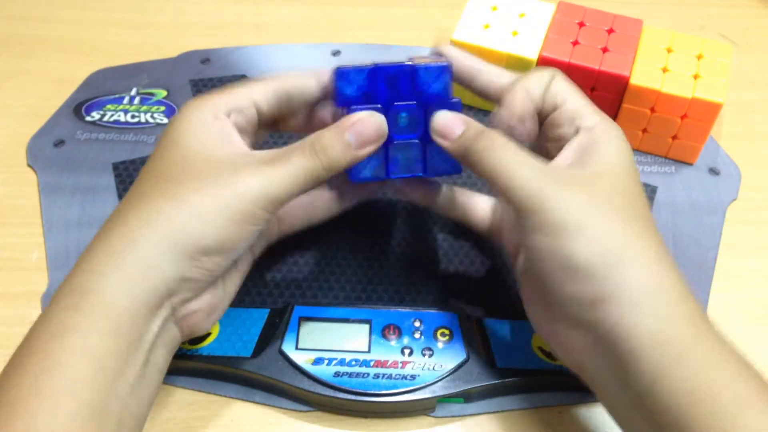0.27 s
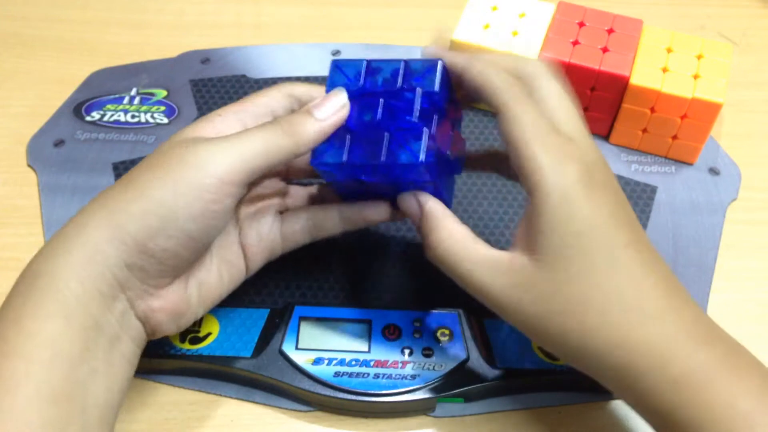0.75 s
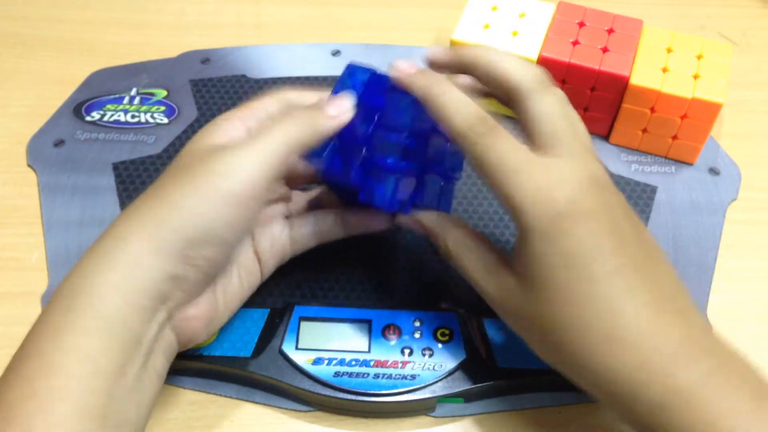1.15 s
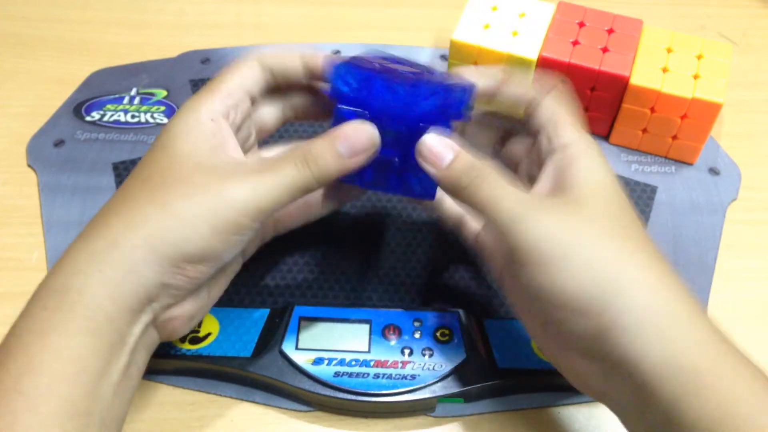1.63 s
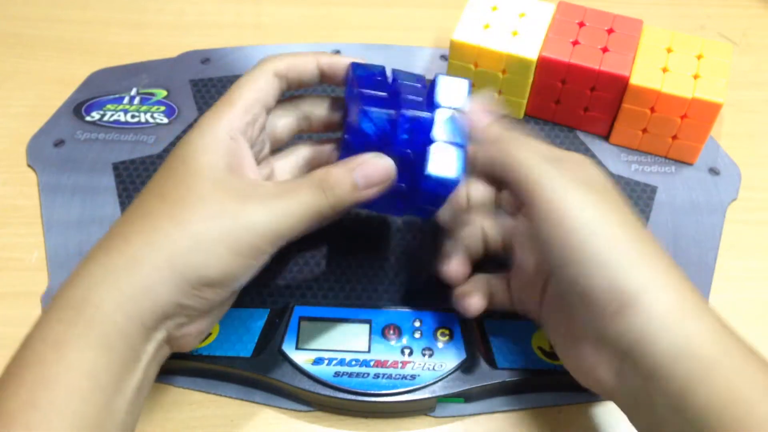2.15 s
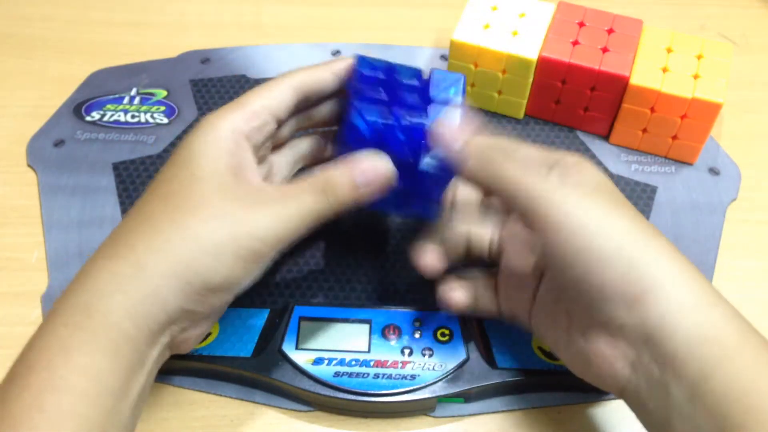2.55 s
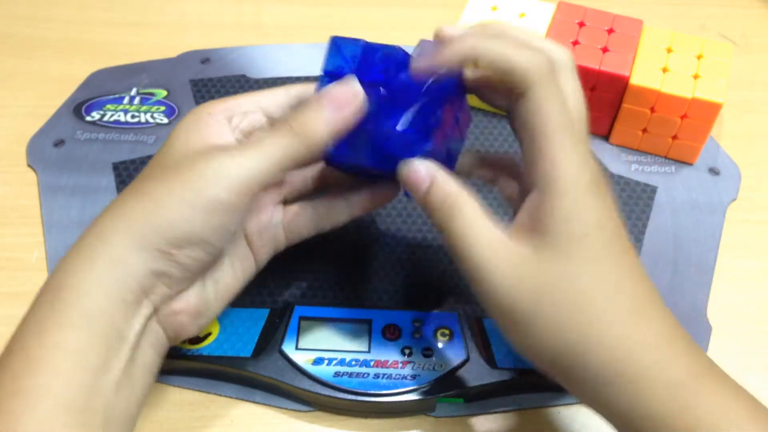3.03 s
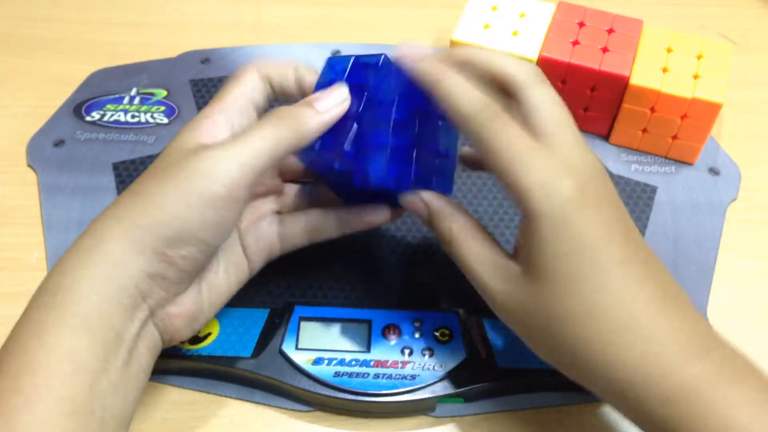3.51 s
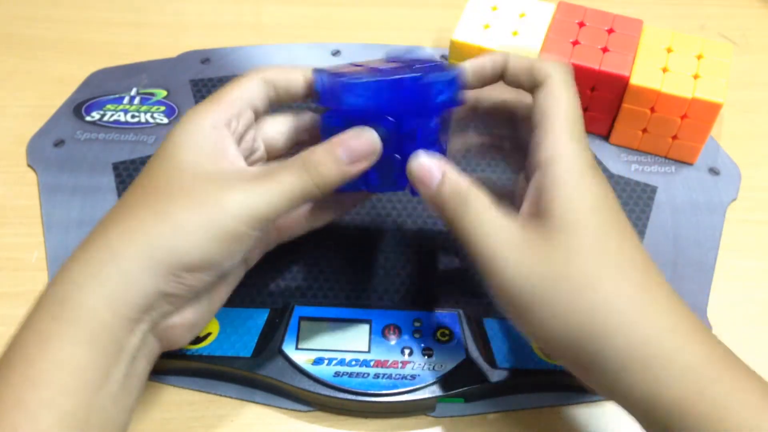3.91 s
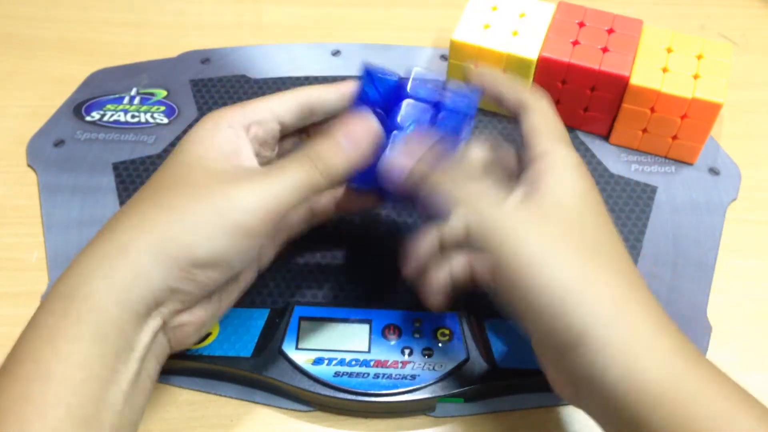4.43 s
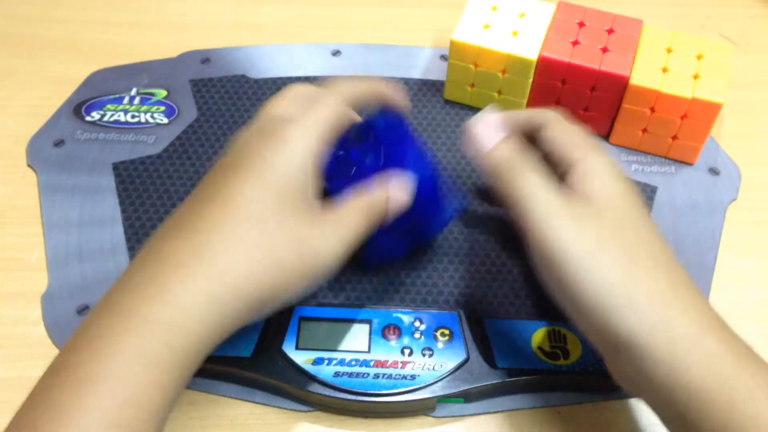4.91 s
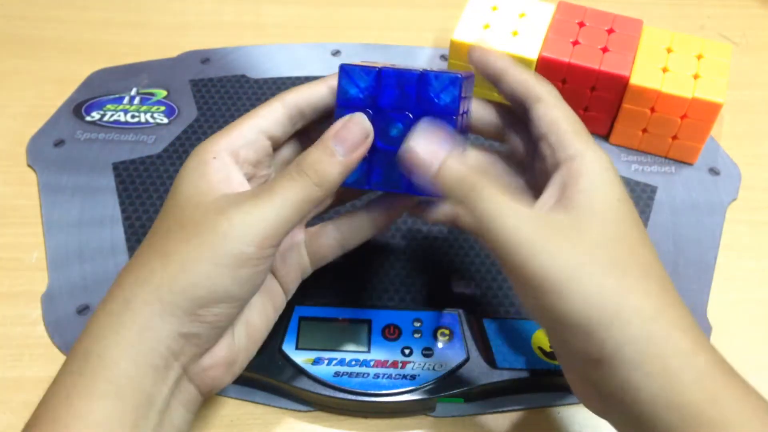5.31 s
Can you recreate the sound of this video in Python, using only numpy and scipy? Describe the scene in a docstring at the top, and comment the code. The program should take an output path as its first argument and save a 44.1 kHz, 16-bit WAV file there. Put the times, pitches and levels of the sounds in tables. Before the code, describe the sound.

A hollow plastic puzzle cube is turned fast by hand, rattling and clacking in quick bursts, then knocks softly onto a matted desk.

```python
"""Fast turning of a puzzle cube

A plastic speed cube is turned fast in the hands above a desk mat, in a small quiet room.
Each flick slides a layer with a fine rattle, made of many tiny noisy slips, and loose pieces tick along.
Hollow pieces collide and seat in clusters of clacks: bursts of noise plus short ringing tones.
Soft, smooth swishes of noise around 1.4 kHz swell and fade now and then.
Near the end the cube knocks on the mat and the desk thuds softly.
Hiss, a faint hum and a slow rumble lie behind it all."""
import sys
import numpy as np
from scipy import signal
from scipy.fft import rfft, irfft
from scipy.io import wavfile

SR = 44100
rng = np.random.default_rng(int(sys.argv[2]) if len(sys.argv) > 2 else 0)


def log_audio(samples):
    """Write samples as a 16-bit WAV file to the path given in sys.argv[1]."""
    # one column per channel
    frames = np.atleast_2d(samples).T
    # limit to full scale, then quantise
    limited = np.clip(frames, -1, 1)
    pcm = np.round(limited * 32767).astype(np.int16)
    wavfile.write(sys.argv[1], SR, pcm)


N = 245183
TIME = np.arange(N) / SR

# room air and microphone hiss, tone colour: (frequency [Hz], relative level [dB per Hz])
AIR_COLOUR = [(15, -33), (30, -27), (39, 2.5), (62, -6), (90, -2), (130, -0.5), (200, -4.5), (300, -7),
              (500, -9.5), (800, -9), (1400, -11.5), (2400, -15), (10000, -15), (13200, -8.5)]
AIR_DB = -60
# faint hum in the room: (frequency [Hz], level [dB])
HUM_TONES = [(199.2, -82)]
# a low rumble that swells and sinks: (time [s], level [dB])
RUMBLE_LEVELS = [(0, -87), (.75, -79), (.95, -71.5), (1.3, -77.5), (1.8, -86), (2.5, -78.5), (3.1, -77),
                 (3.7, -77), (4.2, -90), (5.55, -91)]
# colour of the rumble: (frequency [Hz], relative level [dB])
RUMBLE_TONE = [(20, -34), (32, -20), (42, -8), (62, -13), (90, 12), (125, -7), (250, -30), (600, -48)]

# a layer is flicked round, speeds up and is braked:
# (time at full speed [s], level before trim [dB], speeding-up [s], braking [s])
LAYER_TURNS = [(0.013, -39.5, 0.09, .06), (.10, -48, 0.027, 0.039), (.275, -48, 0.071, 0.14),
               (.385, -49, 0.063, 0.089), (0.519, -47.5, 0.047, 0.045), (1.08, -46.5, 0.079, 0.02),
               (1.255, -47, 0.076, 0.25), (1.425, -44, 0.16, 0.029), (1.533, -38, 0.024, 0.04),
               (1.685, -40, 0.029, 0.03), (1.85, -41.5, 0.082, 0.07), (1.972, -45, 0.018, 0.026),
               (2.075, -39.5, .05, 0.072), (2.419, -56.5, 0.028, 0.098), (2.63, -48, 0.046, .17),
               (2.84, -44, 0.1, 0.13), (3.02, -49, 0.14, 0.084), (3.185, -42, 0.019, .03),
               (3.36, -44.5, 0.1, 0.11), (3.465, -49.5, .03, 0.055), (3.545, -43, 0.019, 0.036),
               (3.645, -45.5, 0.061, .15), (3.765, -38.5, 0.1, .03), (3.94, -42.5, 0.12, 0.25),
               (4.09, -44.5, 0.039, 0.042), (4.178, -52, .03, 0.088), (4.29, -52, 0.048, 0.056),
               (4.415, -45.5, 0.078, 0.13), (4.565, -45, 0.037, 0.1), (4.66, -52, .04, 0.032)]
TURN_RANGE_DB = 17  # how far below full speed a turn is where speeding-up starts and braking ends
# colour of the sliding: (frequency [Hz], relative level [dB])
SLIDE_TONE = [(150, -43), (500, -11), (800, 1.5), (1150, 1.5), (1400, 6), (1750, 7), (2200, 2), (3000, 1),
              (6000, 2.5), (8500, 0), (12000, -0.5), (15500, -8.5)]

# loose pieces tick all the while: level against the turning, its spread, hollow body, treble [dB]; ring [s]
TICK_DB, TICK_SPREAD_DB, TICK_BODY_DB, TICK_TREBLE_DB, TICK_T60 = 2, 2.5, -4, 1.5, 0.0094
IDLE_DB = -68  # keeps the ticks going between turns, while the fingers work
HANDLING_END_S = 4.8  # the ticking stops when the cube knocks on the mat

# pieces colliding and seating:
# (time [s], level before trim [dB], hollow body [dB], treble [dB], time to fade by 60 dB [s])
COLLISIONS = [(0.0185, -30.5, -13, 13, 0.015), (0.0273, -35, 1, -3, 0.032), (0.0656, -39, -2.5, -2, 0.06),
              (.247, -39, -12, 1, .012), (0.2705, -32.5, -1.5, 5.5, 0.015), (0.378, -33.5, -7.5, 0.5, 0.04),
              (.521, -32, -8, 6, 0.0061), (0.5295, -33.5, 9, 14, 0.017), (0.6555, -52.5, -1, 0, 0.007),
              (0.7984, -52, 6.5, 10.5, .032), (.8487, -54, -2, -2, 0.027), (0.882, -54, 5, 1, 0.013),
              (0.9135, -56, 5, -14, 0.037), (1.012, -59, -7, -6, .01), (1.056, -47.5, -8, -3, 0.087),
              (1.0798, -48, -3, 5, 0.036), (1.1465, -45.5, -1, -4, 0.037), (1.186, -28, -12, 3, 0.018),
              (1.2385, -43.5, 6, 13, .007), (1.2493, -34, -4, 4.5, 0.017), (1.2744, -39, -1, -7, .012),
              (1.3121, -40.5, -11, 2, 0.0062), (1.4017, -38, -14, 1, 0.019), (1.4128, -42, -18, 5, .007),
              (1.4251, -38, -11, 10, 0.032), (1.436, -36, -10, 1, .019), (1.505, -37, -5, 11, 0.029),
              (1.529, -28.5, -4.5, 5, 0.078), (1.5545, -37, -10, 6, .032), (1.659, -41, 2, 12, 0.01),
              (1.6771, -26.5, -6, 5.5, 0.015), (1.6942, -29.5, -8, 6, 0.017), (1.711, -39.5, -9, 1, 0.022),
              (1.822, -31.5, -24, 5.5, 0.044), (1.8441, -31.5, -9, 6, 0.029), (1.854, -35, -25, -2, 0.014),
              (1.981, -40.5, -2.5, -2, .029), (2.027, -41, 2.5, 5, 0.026),
              (2.0464, -29.5, -6.5, 2.5, 0.0083), (2.071, -26, -3, 10, 0.03),
              (2.079, -21.5, -8, 5.5, 0.029), (2.0955, -37, -8, -3, .015), (2.1117, -35, -9.5, -2, 0.057),
              (2.1853, -41, -6, 1, 0.0059), (2.2639, -52, -4, 0, 0.011), (2.5866, -34.5, -11, 4.5, 0.01),
              (2.606, -40, -7, -2, .015), (2.618, -35.5, -7, 4, 0.02), (2.6332, -33, -8, -2, 0.019),
              (2.68, -38, -3.5, 0.5, 0.091), (2.7152, -37, -8.5, -5, 0.01), (2.746, -42, 7, 11, .018),
              (2.774, -37.5, -6.5, 0, 0.01), (2.8196, -39, -14, 0, 0.089), (2.8439, -39, -14, 0, .03),
              (2.857, -36.5, -19, 1, .012), (2.8807, -32, -4, 1, 0.021), (2.917, -34.5, 1.5, -5, 0.0054),
              (3.004, -41, -9, -1, 0.046), (3.048, -42.5, -12, -9, 0.027), (3.1221, -35.5, -2.5, 2.5, 0.02),
              (3.1787, -39.5, -11.5, 9, .04), (3.1846, -32, -7, 1, .014), (3.197, -33, -4.5, 4, 0.019),
              (3.3112, -35.5, -9, 10, .039), (3.3177, -33.5, 1, 11.5, .007), (3.3477, -37, -25, 4, 0.018),
              (3.364, -25.5, -19, 2, 0.008), (3.3777, -27, -7, 4, 0.034), (3.5026, -43, 1, 6, 0.018),
              (3.5349, -35.5, 0.5, -2.5, 0.037), (3.6225, -42.5, -14, 7, 0.02),
              (3.7413, -33, -9.5, -0.5, 0.045), (3.7606, -27, -10, 4, 0.055), (3.7825, -36, -5, -1, .016),
              (3.8377, -39, -6.5, 0, 0.011), (3.8827, -37, -7, 1, 0.035),
              (3.9219, -26.5, -10.5, 3.5, 0.025), (3.9481, -32, -10.5, 4, 0.054),
              (3.9967, -29.5, -7, 8, 0.0079), (4.0295, -31, -16, 6, .036), (4.0726, -34.5, -14, 18, 0.034),
              (4.0793, -30.5, -11, 3.5, 0.059), (4.1018, -25, 5.5, 22.5, 0.018),
              (4.165, -38.5, -1, 8, 0.027), (4.241, -42, -3, -2, 0.0089), (4.278, -40, -5, 2.5, .023),
              (4.393, -33.5, -10, 14, 0.011), (4.405, -32, -0.5, 1, .005), (4.4635, -35.5, -6, 2, .018),
              (4.477, -33, -1, 1, 0.012), (4.5213, -38, -6.5, -7, 0.0073), (4.5782, -30.5, -5, 2, 0.053),
              (4.6772, -37, -2, 4.5, 0.013), (4.807, -36.5, 0, 1.5, 0.068), (5.511, -54.5, 7.5, 5, 0.1)]
# resonances of the hollow pieces, before each hit varies them:
# (frequency [Hz], time to fade by 60 dB [s], relative level [dB])
SHELL_TONES = [(731, 0.065, -10), (969, 0.061, -2.5), (1440, 0.023, -8.5), (1751, 0.065, -3.5),
               (2403, 0.059, -14), (3020, 0.042, -1), (3895, 0.041, -3), (4750, 0.016, 2.5),
               (5940, 0.0072, 6.5), (8100, 0.022, 0.5), (9180, 0.0025, 12.5), (13600, .007, -20)]
# colour of a collision: (frequency [Hz], relative level [dB])
CLACK_TONE = [(150, -20), (400, -9), (550, -15), (720, -1.5), (850, -5.5), (1100, -1), (1700, 1),
              (2400, 3.5), (3200, 1.5), (6000, 2.5), (8500, 7), (11000, 3.5), (13500, 4), (15500, -4)]
SCUFF_DB, SCUFF_T60 = -10.5, 0.015  # scuff around a clack: level against the blow [dB], fade [s]
RISE_S, SNAP_T60 = 0.00039, 0.0012  # rise of the blow [s], fade of its hard snap [s]

# soft, smooth swishes that swell and fade: (time at the middle [s], length [s], level [dB])
SOFT_SWISHES = [(0.705, 0.078, -69), (1.307, 0.36, -61), (3.003, 0.21, -61.5), (4.36, 0.22, -61.5),
                (5.14, 0.17, -73)]
# colour of the swishes: (frequency [Hz], relative level [dB])
SWISH_TONE = [(400, -32), (900, -16), (1350, 4), (1750, -6.5), (2600, -15), (8000, -28)]

# resonances of the desk under the mat: (frequency [Hz], time to fade by 60 dB [s], level [dB])
DESK_TONES = [(75.5, 0.15, -42), (93.8, 0.57, -50), (162, 0.11, -42.5), (256, 0.16, -56)]
KNOCK_S = 4.807

TOP_HZ = 15400  # the recorder keeps what lies below this


def undb(db):
    """Turn decibels into a plain multiplier."""
    return 10 ** (np.asarray(db) / 20)


def unit(x):
    """Scale to an average strength (rms) of 1."""
    return x / np.sqrt(np.mean(x ** 2))


def band(x, lo_hz, hi_hz):
    """Keep mainly the pitches between two frequencies, without looking ahead in time."""
    return signal.sosfilt(signal.butter(3, [lo_hz, hi_hz], "band", fs=SR, output="sos"), x)


def colour(x, points, size=4096):
    """Shape the tone through (frequency [Hz], level [dB]) points, without looking ahead in time."""
    hz, db = np.transpose(points)
    grid = np.maximum(np.fft.rfftfreq(size, 1 / SR), 1)
    curve_db = np.interp(np.log(grid), np.log(hz), db)
    # folding the cepstrum (the spectrum of the log spectrum) makes the filter respond at once
    cepstrum = irfft(np.log(undb(curve_db)))
    cepstrum[1:size // 2] *= 2
    cepstrum[size // 2 + 1:] = 0
    response = irfft(np.exp(rfft(cepstrum)))
    return signal.fftconvolve(x, response)[:len(x)]


def fade(t, t60):
    """Die away smoothly, 60 dB down after t60 seconds."""
    return np.exp(-np.log(1000) * t / t60)


def add(out, s, sound):
    """Mix a sound in at time s."""
    start = max(int(s * SR), 0)
    out[start:start + len(sound)] += sound[:max(N - start, 0)]


def quiet():
    """Room air and microphone hiss as noise, a faint steady hum and a slowly swelling rumble."""
    air = undb(AIR_DB) * unit(colour(rng.standard_normal(N), AIR_COLOUR, size=16384))
    # the square root of 2 gives each tone its level as rms
    hum = sum(np.sqrt(2) * undb(db) * np.sin(2 * np.pi * hz * TIME) for hz, db in HUM_TONES)
    rumble = unit(colour(rng.standard_normal(N), RUMBLE_TONE, size=16384))
    rumble_level = undb(np.interp(TIME, *np.transpose(RUMBLE_LEVELS)))
    return air + hum + rumble * rumble_level


def turning():
    """Strength of the turning over time: every flick swells to full speed and dies away."""
    speed = 0
    for s, db, rise_s, brake_s in LAYER_TURNS:
        # 0 at full speed, 1 at the start of speeding-up and at the end of braking
        away = np.maximum((s - TIME) / rise_s, (TIME - s) / brake_s)
        speed = np.maximum(speed, undb(db - TURN_RANGE_DB * away))
    return speed


def grainy_noise(grain_rate, spread_db, grain_t60, smooth_db, size=512):
    """Noise made of dense tiny bursts of uneven size (rate per second) above a smooth hiss."""
    happens = rng.random(N) < grain_rate / SR
    grains = happens * undb(spread_db * np.minimum(rng.exponential(size=N), 3))
    # each grain releases a short burst of energy
    energy = signal.fftconvolve(grains ** 2, fade(TIME[:size], grain_t60) ** 2)[:N]
    strength = unit(np.sqrt(np.abs(energy)))
    return unit(rng.standard_normal(N) * (strength + undb(smooth_db)))


def sliding(speed, trim_db=-2):
    """Edges tick over each other in tiny slips while a layer turns, louder when it turns faster."""
    slips = grainy_noise(grain_rate=480, spread_db=4.5, grain_t60=.007, smooth_db=-10)
    return unit(colour(slips, SLIDE_TONE)) * speed * undb(trim_db)


def loose_ticks(speed, colour_spread_db=3, count=260):
    """Small collisions at uneven moments, stronger as the turning is faster; rows as in COLLISIONS."""
    s = (np.arange(count) + rng.random(count)) * HANDLING_END_S / count
    strength, body, treble = rng.standard_normal((count, 3)).T
    drive = np.interp(s, TIME, speed) * undb(TICK_DB) + undb(IDLE_DB)
    level_db = 20 * np.log10(drive) + TICK_SPREAD_DB * strength
    body_db = TICK_BODY_DB + colour_spread_db * body
    treble_db = TICK_TREBLE_DB + colour_spread_db * treble
    return np.column_stack([s, level_db, body_db, treble_db, np.full(count, TICK_T60)])


def attack_rms(x, lead, attack):
    """Average strength of each hit just after the pieces meet."""
    return np.sqrt(np.mean(x[:, lead:lead + attack] ** 2, axis=1, keepdims=True))


def clacks(rows, snap_db=4, ring_db=-9, detune=0.052, body_hz=2000, treble_hz=6500, trim_db=-1,
           chatter_db=1.0, size=2560):
    """Each collision is a brief scuff, a hard snap, a chatter of loose pieces and a ring of the hollow shells."""
    s, level_db, body_db, treble_db, t60 = np.transpose(rows)[:, :, None]
    lead, attack, contact = int(.008 * SR), int(.004 * SR), 16  # in samples
    t = (np.arange(size) - lead) / SR
    after = np.maximum(t, 0)

    # bevelled edges drag over each other around the moment they seat
    scuff = undb(SCUFF_DB) * fade(np.abs(t), SCUFF_T60)
    decay = fade(after, t60) + undb(snap_db) * fade(after, SNAP_T60)
    blow = decay * (1 - np.exp(-after / RISE_S))
    # the blow runs on through neighbouring pieces as a string of brief uneven contacts
    contacts = undb(chatter_db * rng.standard_normal((len(s), size // contact)))
    chatter = np.repeat(contacts, contact, axis=1)
    hits = rng.standard_normal((len(s), size)) * chatter * (scuff + blow)

    for hz, mode_t60, db in SHELL_TONES:
        # another piece is struck at another spot each time, so tuning and strength vary
        tuning, strength = rng.uniform(-1.23, 1, (len(s), 2)).T[:, :, None]
        tone = np.sin(2 * np.pi * hz * (1 + detune * tuning) * after)
        hits += undb(db + ring_db) * strength * fade(after, mode_t60) * tone

    # flat faces meeting sound hollow, corners catching sound bright
    parts = band(hits, 340, body_hz), band(hits, body_hz, treble_hz), band(hits, treble_hz, 18600)
    body, middle, treble = (part / attack_rms(part, lead, attack) for part in parts)
    hits = undb(body_db) * body - middle + undb(treble_db) * treble
    hits *= undb(level_db + trim_db) / attack_rms(hits, lead, attack)

    out = np.zeros(N)
    for when, hit in zip(s.ravel(), hits):
        add(out, when - lead / SR, hit)
    return colour(out, CLACK_TONE)


def soft_swishes():
    """Smooth noise, strongest around 1.4 kHz, swells and fades now and then."""
    swell = sum(undb(db) * np.exp(-2 * ((TIME - s) / length) ** 2) for s, length, db in SOFT_SWISHES)
    noise = grainy_noise(grain_rate=350, spread_db=0, grain_t60=0.022, smooth_db=-3)
    return swell * unit(colour(noise, SWISH_TONE))


def desk_thud(push_s=0.012, boom_db=-58, boom_t60=0.65, boom_lo_hz=65, boom_hi_hz=280):
    """The rubber mat softens the knock, so only low desk-top tones ring, and the room booms briefly."""
    out, t = np.zeros(N), TIME[:SR]
    ring = sum(undb(db) * fade(t, t60) * np.sin(2 * np.pi * hz * t) for hz, t60, db in DESK_TONES)
    low_noise = unit(band(rng.standard_normal(len(t)), boom_lo_hz, boom_hi_hz))
    boom = undb(boom_db) * fade(t, boom_t60) * low_noise
    soft_start = 1 - np.exp(-t / push_s)
    add(out, KNOCK_S, (ring + boom) * soft_start)
    return out


def room(x, wet_db=-8, low_t60=0.39, high_t60=0.099, build_s=0.0014, near_db=-8.5, near_t60=0.14, count=18):
    """Desk and nearby things add early echoes; the walls add a diffuse tail whose treble dies first."""
    t = TIME[:SR // 3]
    build = 1 - np.exp(-(t / build_s) ** 2)
    echoes = rng.standard_normal(len(t)) * build * fade(t, near_t60)
    near = signal.fftconvolve(x, echoes / np.linalg.norm(echoes))[:N]
    edges = np.geomspace(350, 16000, count + 1)  # band limits [Hz]
    wet = np.zeros(N)
    for lo, hi, t60 in zip(edges, edges[1:], np.linspace(low_t60, high_t60, count)):
        # the room stores the energy of each band and lets it go slowly
        store = (build * fade(t, t60)) ** 2
        energy = signal.fftconvolve(band(x, lo, hi) ** 2, store / store.sum())[:N]
        wet += np.sqrt(np.abs(energy)) * unit(band(rng.standard_normal(N), lo, hi))
    return x + undb(near_db) * near + undb(wet_db) * wet


def scene():
    """The cube and the soft swishes in the room, the desk and the background."""
    speed = turning()
    collisions = np.vstack([COLLISIONS, loose_ticks(speed)])
    in_room = sliding(speed) + clacks(collisions) + soft_swishes()
    return (quiet() + room(in_room) + desk_thud())[None]


def record(dry):
    """The recorder cuts the top steeply."""
    return signal.sosfilt(signal.ellip(10, .2, 70, TOP_HZ, fs=SR, output="sos"), dry)


dry = scene()
out = record(dry)
log_audio(out)
```